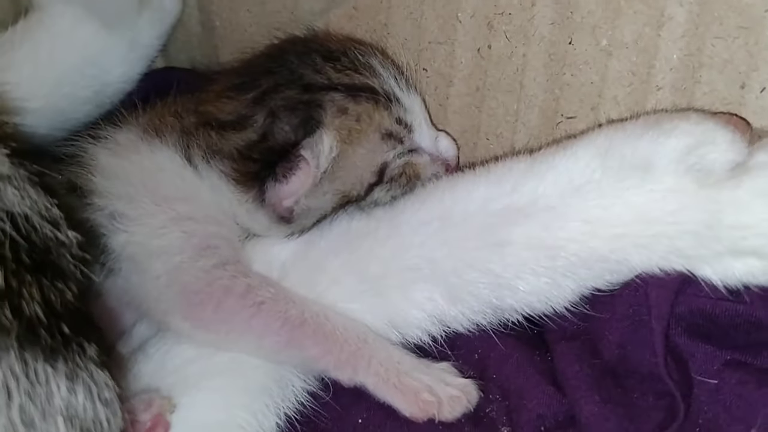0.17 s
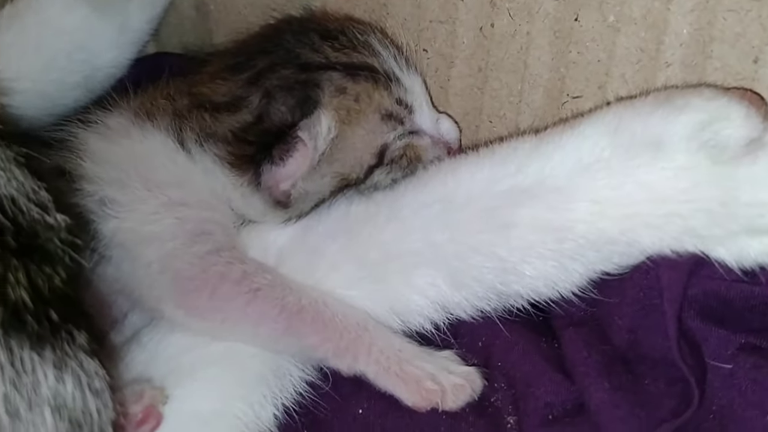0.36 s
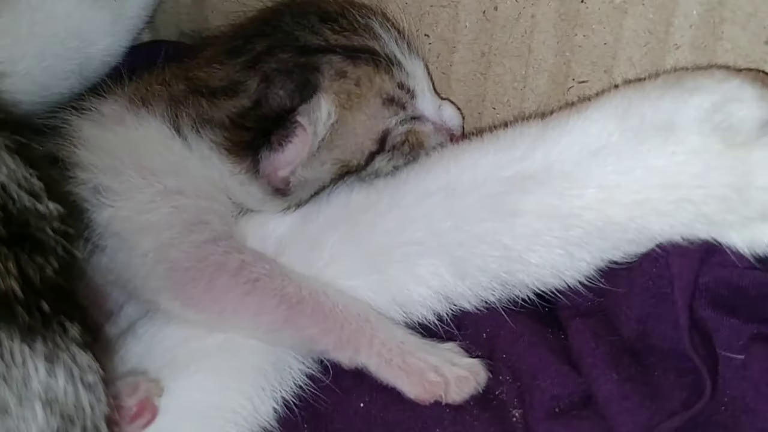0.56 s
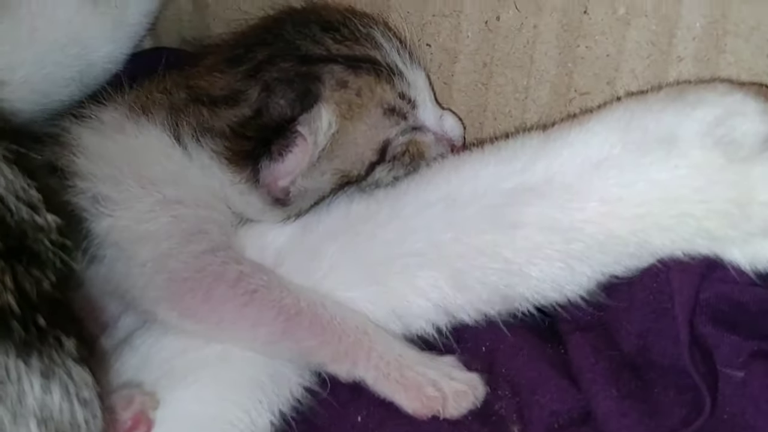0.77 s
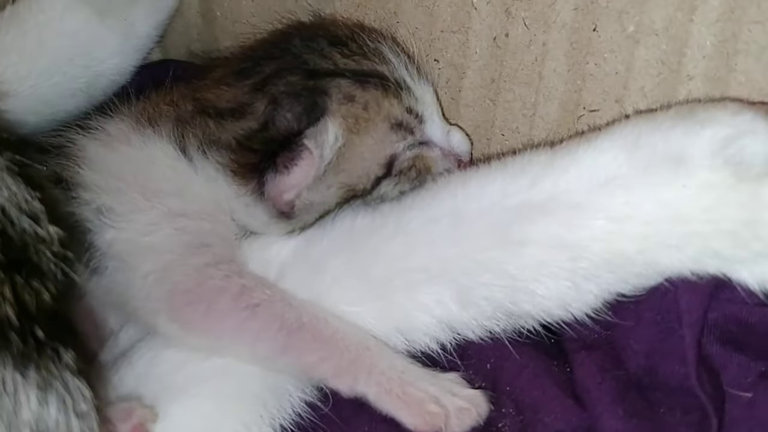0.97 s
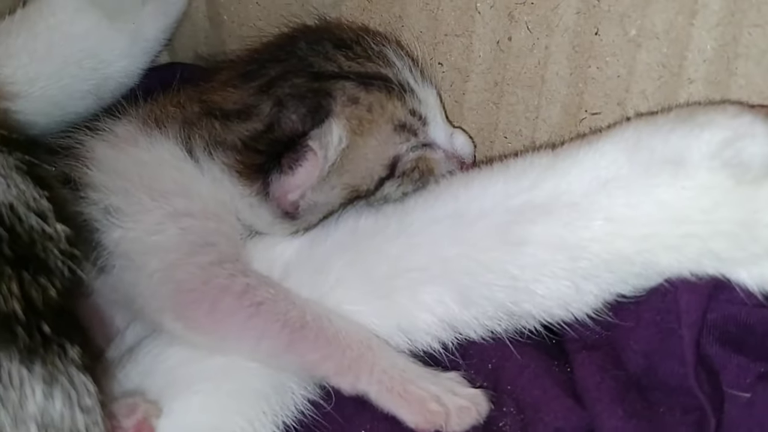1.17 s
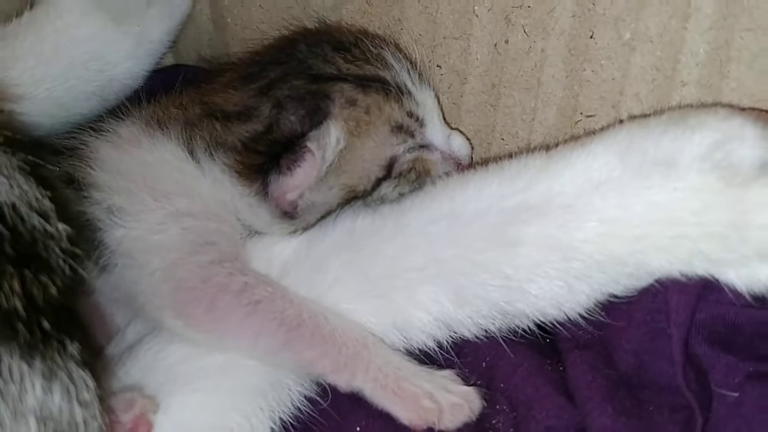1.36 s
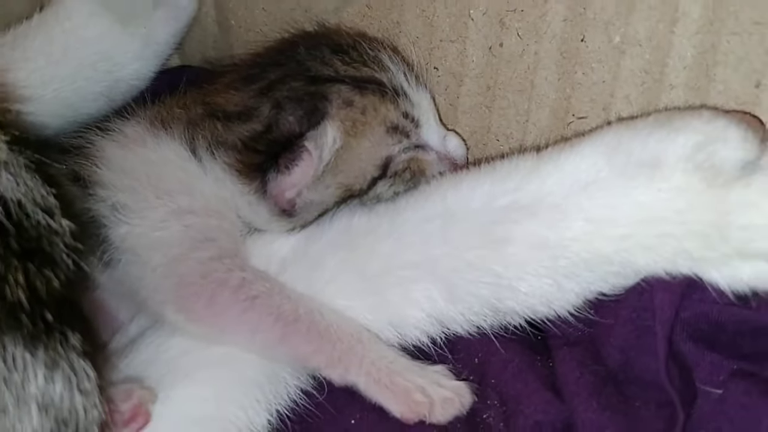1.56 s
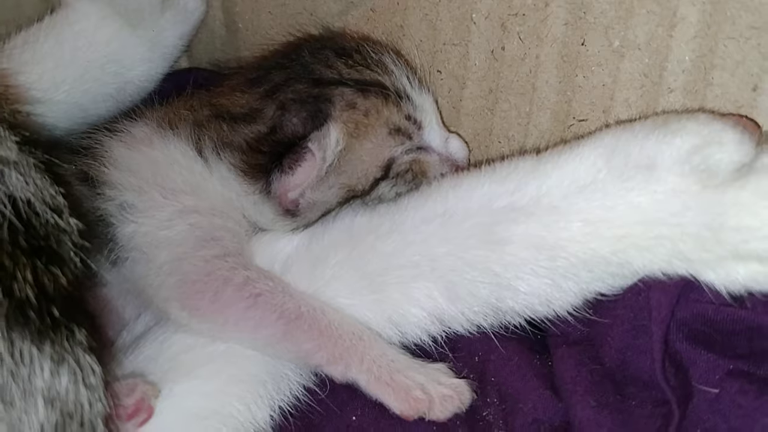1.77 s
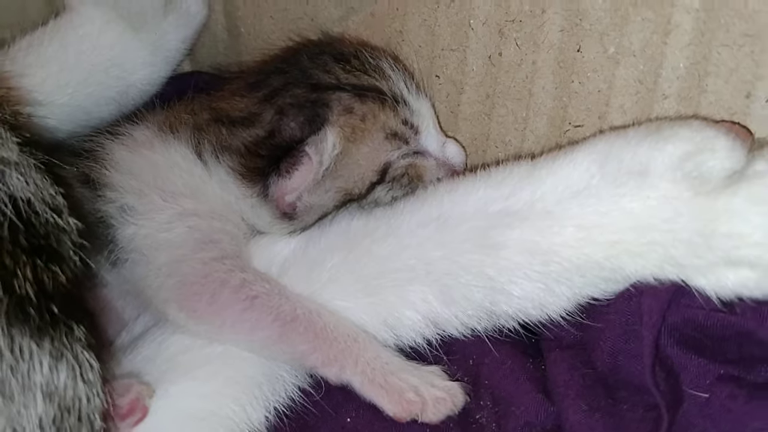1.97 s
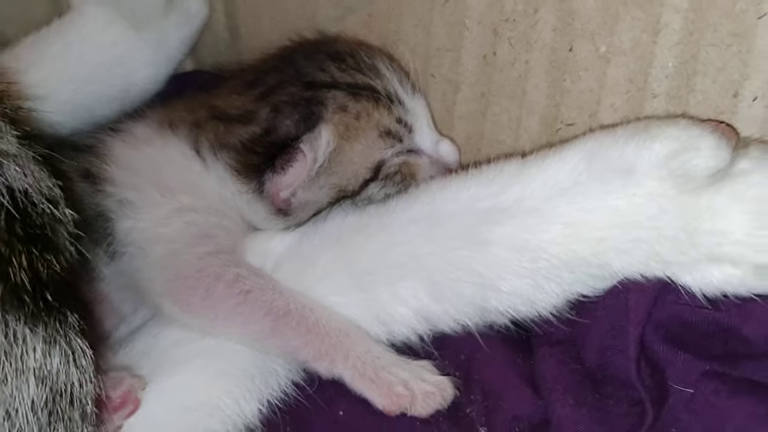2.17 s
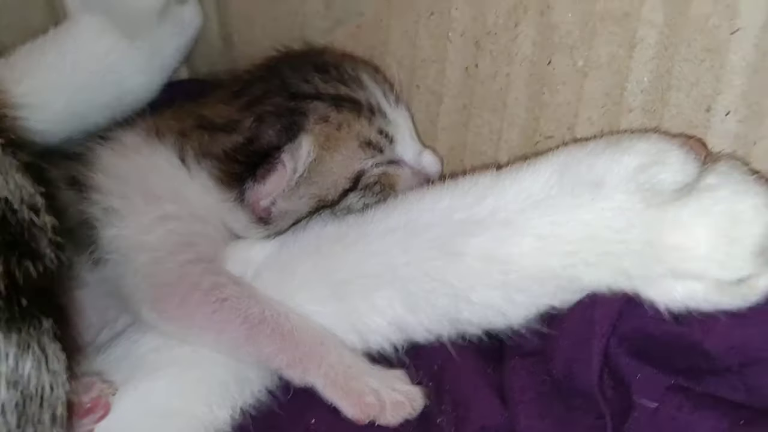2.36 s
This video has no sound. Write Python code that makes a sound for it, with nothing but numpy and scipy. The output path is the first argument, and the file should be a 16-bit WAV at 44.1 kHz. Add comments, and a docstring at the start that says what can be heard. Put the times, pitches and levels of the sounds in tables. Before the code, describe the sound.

A cat purrs softly and low up close, interrupted by one sharp hollow tap on cardboard

```python
"""A soft purr and a low hum are heard first, close to the microphone, over room rumble and hiss.
Throat pulses ring the cat's chest in a cardboard box; two wavering tones make the hum.
The box is bumped once: a short scuff, a sharp tap of rough noise, a hollow ring and low thuds.
Dry ticks are tiny resonances; rustles, crackles and high snaps are bursts of shaped noise.
The tap, and more faintly the ticks, rustles and crackles, draw an answer from the room."""
import sys
import numpy as np
from scipy import signal
from scipy.fft import rfft, irfft, next_fast_len
from scipy.io import wavfile
from scipy.ndimage import map_coordinates

SR = 44100
rng = np.random.default_rng(int(sys.argv[2]) if len(sys.argv) > 2 else 0)


def transcribe(signal):
    """Save signal, clipped to [-1, 1], as a 16-bit WAV file at the path in sys.argv[1]."""
    frames = np.atleast_2d(signal).T
    limited = np.clip(frames, -1, 1)
    pcm = np.round(limited * 32767).astype(np.int16)
    wavfile.write(sys.argv[1], SR, pcm)


N = 110250


def amp(db):
    """Decibels to gain."""
    return 10 ** (np.asarray(db) / 20)


def unit(x):
    """Scale to rms 1."""
    return x / np.sqrt(np.mean(x ** 2) + 1e-20)


def along(points, hz):
    """Read (f/Hz, value) points on a log frequency axis."""
    f, v = np.transpose(points)
    return np.interp(np.log(hz + 1), np.log(f + 1), v)


def curve(rows):
    """Read (t/s, value) points as one value per sample."""
    return np.interp(np.arange(N) / SR, *np.transpose(rows))


def since(s):
    """Seconds since s, zero before."""
    return np.maximum(np.arange(N) / SR - s, 0)


def wobble(rate):
    """A smooth random curve, rate knots a second."""
    knots = rng.standard_normal(int(N * rate / SR) + 4)
    return map_coordinates(knots, [np.arange(N) * rate / SR])


def filtered(x, response):
    """Apply a complex response of frequency to x."""
    m = next_fast_len(N + SR // 2)
    hz = np.fft.rfftfreq(m, 1 / SR)
    return irfft(rfft(x, m) * response(hz), m)[:N]


def noise(colour):
    """Coloured noise of rms 1."""
    return unit(filtered(rng.standard_normal(N), lambda hz: amp(along(colour, hz))))


def grainy(colour, rough_db, rate):
    """Coloured noise of rms 1 that comes in sharp grains, about rate a second."""
    grains = amp(rough_db * np.clip(wobble(rate), -2, 2)) * rng.standard_normal(N)
    return unit(filtered(grains, lambda hz: amp(along(colour, hz))))


def resonate(x, peaks):
    """Pass x through resonances that fall away steeply on both sides."""
    def band(f, centre, width):
        return 1j * f * width / (centre * centre - f * f + 1j * f * width)

    def response(f):
        total = 0
        for k, (centre, width, db) in enumerate(peaks):
            sign = (-1) ** k  # neighbours have opposite signs
            total = total + sign * amp(db) * band(f, centre, width) * band(f, centre, centre)
        return total
    return filtered(x, response)


def impulses(times, sizes):
    """One impulse for each time."""
    return np.bincount(np.clip(np.round(times * SR).astype(int), 0, N - 1), sizes, N)


def purr():
    """Throat pulses ring the chest; each lets through a faint puff of air."""
    # pulse rate of the throat: t/s, pulses per second
    pulse_rate = [(0, 34), (.33, 32.5), (1.0, 32.1), (1.7, 32.1), (1.98, 30.6), (2.5, 31.3)]
    # effort of the purr: t/s, level/dB
    effort = [(0, -66.5), (.225, -63), (.255, -49.5), (.295, -53), (.37, -60), (.49, -69), (.58, -54.5),
              (.68, -57.5), (1.0, -66), (1.13, -67.5), (1.21, -55), (1.29, -56.5), (1.35, -67.5),
              (1.46, -71), (1.6, -58.5), (1.69, -64), (1.89, -63), (1.94, -53.5), (2.03, -54), (2.1, -63),
              (2.5, -73)]
    # resonances of the cat's chest in the box: f/Hz, width/Hz, level/dB
    chest = [(156, 15, 0.5), (184, 24, -1.5), (260, 46, -19), (312, 27, -17.5), (435, 25, -23)]
    # relative colour of the airy flutter: f/Hz, level/dB
    flutter_colour = [(400, 1), (700, 3), (2500, 0), (5000, -7), (12000, -14)]
    # level of the air that the purr lets through: t/s, level/dB
    flutter_level = [(0, -73), (.13, -78), (.28, -70.5), (.37, -84), (.62, -77), (1.0, -76.5), (1.45, -80),
                     (1.78, -95), (1.97, -76), (2.12, -92)]
    jitter_s, scatter_db, flutter_decay_s = 0.00035, 1.5, 0.008

    cycles = np.cumsum(curve(pulse_rate)) / SR
    times = np.flatnonzero(np.diff(np.floor(cycles))) / SR
    chance = rng.standard_normal((len(times), 2))
    pulses = impulses(times + jitter_s * chance[:, 0], amp(scatter_db * chance[:, 1]))
    voice = unit(resonate(pulses, chest))
    gate = signal.lfilter([1], [1, -np.exp(-1 / (flutter_decay_s * SR))], pulses)
    air = unit(gate * noise(flutter_colour))
    return amp(curve(effort)) * voice + amp(curve(flutter_level)) * air


def hum():
    """Two low tones that swell and waver."""
    # swells of the hum: t/s, level/dB
    hum_level = [(0, -62.5), (.33, -56), (.45, -64), (.6, -54.5), (.9, -59.5), (1.1, -56), (1.399, -63.5),
                 (1.7, -59), (1.82, -61.5), (1.92, -56.5), (2.062, -55), (2.2, -69.5), (2.5, -67.5)]
    # swells of the lower drone: t/s, level/dB
    drone_level = [(0, -63.5), (0.179, -57.5), (.42, -61), (.62, -69), (1.0, -62), (1.2, -69.5), (2.5, -75)]

    def tone(hz, level):
        swell = amp(curve(level) + 0.4 * wobble(13.3))  # wobble in dB
        phase = 2 * np.pi * hz * since(0) + 0.078 * wobble(3.5)  # radians
        return np.sqrt(2) * swell * np.sin(phase)
    return tone(100.3, hum_level) + tone(66.2, drone_level)


def background():
    """Low room rumble and microphone hiss, each of slightly uneven level."""
    # relative colour of the room rumble: f/Hz, level/dB
    rumble_colour = [(15, -2.5), (55, -2), (85, -0.5), (125, -7), (200, -9), (300, -16), (380, -25),
                     (1000, -32.5), (2500, -37.5), (5000, -65.5)]
    # relative colour of the microphone hiss: f/Hz, level/dB
    hiss_colour = [(500, 6.5), (2500, 7.5), (4000, 2), (6100, 0.5), (6600, 8.5), (7000, 18), (7450, 3.5),
                   (8400, 4), (9500, -4.5), (12000, 0), (14000, 7.5), (15600, 8.5)]
    rumble_db, hiss_db = -59.5, -71.5
    rumble = amp(rumble_db + 0.16 * wobble(11.0)) * noise(rumble_colour)
    hiss = amp(hiss_db + 0.13 * wobble(3.6)) * noise(hiss_colour)
    return rumble + hiss


def crackles():
    """Hairs catch and slip in fine, dry crackles."""
    # crackles of fur, at their peaks: t/s, level/dB, spread/s
    events = [(.21, -75, .055), (.8195, -63.5, .004), (1.894, -70, 0.0034), (1.965, -79, 0.053),
              (2.024, -77, .003)]
    # their relative colour: f/Hz, level/dB
    colour = [(900, -25), (1400, 1), (1900, -12), (2500, -3), (3000, -7), (3600, 3.5), (4200, -12.5),
              (5000, -7), (6000, -19), (8300, -13), (10000, -39)]
    swell = np.zeros(N)
    for s, db, spread in events:
        swell += amp(db) * np.exp(-.5 * ((since(0) - s) / spread) ** 2)
    return swell * grainy(colour, rough_db=4, rate=700)


def room(x):
    """The room answers with a decaying noise tail, longest in the bass."""
    # decay of the room: f/Hz, t60/s
    decay = [(150, 1.54), (400, 0.59), (1500, 0.38), (4000, 0.62), (12000, 0.04)]
    # colour of its answer: f/Hz, level/dB
    colour = [(60, -4), (240, -1), (380, -1.5), (750, -4), (1300, -1.5), (2300, 1), (4000, -11), (6000, 2),
              (12000, -6)]
    room_db = -3.5
    hz, t, z = signal.stft(rng.standard_normal(SR // 2), SR, nperseg=256)
    fading = z * amp(-60 * t / along(decay, hz)[:, None])
    tail = signal.istft(fading, SR, nperseg=256)[1]
    delayed = np.pad(tail, (SR // 200, 0))  # 5 ms before the first answer
    wet = signal.fftconvolve(x, delayed / np.linalg.norm(tail))[:N]
    return amp(room_db) * filtered(wet, lambda hz: amp(along(colour, hz)))


def ticks():
    """Tiny dry clicks, each with its own pitch and share of ring and edge."""
    # ticks: t/s, relative level/dB, ring/dB, edge/dB, pitch ratio
    events = [(.2495, -55, -5, -6, 0.88), (0.5094, -50, -9, -16, 0.96), (0.5409, -49.5, -0.5, -4.5, 1),
              (0.581, -54, -1, -7, 1.04), (0.5863, -44, -5, -7.5, 0.95), (0.5925, -48.5, 1, -4, 1.03),
              (0.8213, -53, 2.5, 1.5, 1.1), (0.9225, -59, 6, 0, 0.99), (1.078, -55.5, 1, 2, 1.02),
              (1.094, -51, 0, 1.5, 0.97), (1.3097, -65, -2, 10.5, 0.88), (1.5661, -45, -10, -7.5, 0.995),
              (1.6371, -52, 1.5, -10, 0.91), (2.0726, -55, -8, -16, 0.92), (2.2239, -48.5, 0.5, -1, 0.98),
              (2.3941, -53.5, -6, -8.5, 0.83)]
    # resonances before the pitch ratio, all three: f/Hz, width/Hz, level/dB
    # dull body
    body_peaks = [(278, 120, 7), (479, 33, 5), (760, 85, 1.5), (1344, 176, 2), (1716, 99, 1.5)]
    # middle ring
    ring_peaks = [(2200, 230, -10), (2510, 195, 2.5)]
    # bright edge
    edge_peaks = [(3470, 340, -14.5), (4810, 270, -4), (6850, 240, -5.5), (8350, 540, -11.5)]

    click = impulses(np.zeros(1), [1])
    body, ring, edge = [resonate(click, peaks)[:SR // 10]
                        for peaks in (body_peaks, ring_peaks, edge_peaks)]
    t = np.arange(len(body)) / SR
    clicks = np.zeros(N)
    for start, level, ring_db, edge_db, ratio in events:
        shape = body - amp(ring_db) * ring + amp(edge_db) * edge
        clicks += amp(level) * np.interp((since(0) - start) * ratio, t, shape, 0, 0)
    # the highest peak of all sits at the highest level in the table
    loudest_db = max(row[1] for row in events)
    return clicks * amp(loudest_db) / np.abs(clicks).max()


def bump():
    """Each blow gives a rough crack and rings the cardboard."""
    # blows on the box: t/s, relative level/dB, crack/dB relative to the blow
    blows = [(0.7069, -14, -14.5), (0.7306, -17, -6), (.7385, -1.5, 2.5), (0.7455, -3, 1), (.818, -25, 3)]
    # modes of the box: f/Hz, relative level/dB, t60/s
    modes = [(148.5, -49.5, 0.28), (200.6, -36, 0.3), (243.3, -30, 0.22), (256, -45, 0.6),
             (304.5, -49, 0.45), (328, -49, 0.45), (411, -40.5, 0.1), (546.5, -57, 0.24), (611, -58, 0.26),
             (915, -49, 0.08), (1206, -45.5, 0.06), (1384, -46, 0.055), (1607, -51, 0.05)]
    # relative colour of the crack: f/Hz, level/dB
    crack_colour = [(100, -8), (350, 7), (520, -7), (750, -15), (1000, -9), (1450, -8), (2100, -20),
                    (2700, -18.5), (3200, -32), (3900, -16.5), (4500, -20), (5500, -42), (8000, -24.5),
                    (10000, -45), (15000, -32)]
    crack_gain_db, crack_t60_s, ring_gain_db = -37.5, 0.036, 1.0

    crack, ring = np.zeros(N), np.zeros(N)
    for s, db, crack_db in blows:
        t = since(s)
        grain = grainy(crack_colour, rough_db=3.5, rate=900)
        fade = amp(db + crack_db + crack_gain_db - 60 * t / crack_t60_s)
        crack += fade * (1 - np.exp(-t / 0.0003)) * grain  # 0.3 ms onset
        t = t[:int((s + .5) * SR)]  # half a second of ring
        for hz, level, t60 in modes:
            fade = amp(db + level + ring_gain_db - 60 * t / t60)
            onset = 1 - np.exp(-t * hz / .5)  # builds over half a cycle
            ring[:len(t)] += fade * onset * np.sin(2 * np.pi * hz * t)
    return crack, ring


def rustles():
    """Fur and bedding brush the cardboard in short grainy swells."""
    # rustles, at their peaks: t/s, level/dB, attack/s, release/s, fizz/dB relative to the body
    events = [(0.738, -51.5, 0.009, 0.012, -1.5), (0.82, -60, 0.003, 0.0071, -17),
              (.958, -65, 0.033, 0.022, -6), (1.102, -68, 0.037, 0.026, -6),
              (1.38, -68.5, 0.011, 0.0062, -11), (1.844, -69.5, 0.0021, 0.0035, -4),
              (2.441, -74.5, 0.011, 0.021, 10)]
    # relative colour of the body: f/Hz, level/dB
    body_colour = [(200, -0.5), (700, 4.5), (1400, -3), (2400, -8.5), (3200, -18), (4100, -7.5),
                   (5000, -18), (9000, -30), (15000, -41)]
    # relative colour of the fizz: f/Hz, level/dB
    fizz_colour = [(2000, -55), (6000, -10), (8100, 2), (10000, -12), (12500, 2), (15500, -0.5)]
    body, fizz = np.zeros(N), np.zeros(N)
    for s, db, attack, release, fizz_db in events:
        t = since(0) - s
        swell = amp(db) * np.exp(np.minimum(t / attack, -t / release))
        body += swell
        fizz += swell * amp(fizz_db)
    dull = body * grainy(body_colour, rough_db=2.5, rate=700)
    return dull + fizz * grainy(fizz_colour, rough_db=3, rate=700)


def thuds():
    """The box floor gives way and swings back, faster as it stiffens."""
    # thuds of the floor: t/s, f/Hz, rise/(Hz per s), level/dB, attack/s, t60/s
    events = [(.7495, 54, 380, -28.5, 0.0086, 0.16), (.742, 33, 2, -35, 0.0086, 0.2),
              (0.93, 40, 0, -43, 0.0047, 0.28)]
    out = np.zeros(N)
    for s, hz, rise, db, attack, t60 in events:
        t = since(s)
        fade = amp(db - 60 * t / t60) * (1 - np.exp(-t / attack))
        out += fade * np.sin(2 * np.pi * (hz + rise * t / 2) * t)
    return out


def snaps():
    """Hair-thin snaps of noise high in the treble start at once and die in milliseconds."""
    # snaps: t/s, level/dB
    events = [(0.785, -55), (1.6368, -48), (2.393, -58)]
    # their relative colour: f/Hz, level/dB
    colour = [(6000, -30), (10000, -15), (13000, -3), (15500, -3.5)]
    t60_s = 0.005
    envelope = np.zeros(N)
    for s, db in events:
        envelope += amp(db - 60 * since(s) / t60_s) * (since(s) > 0)
    return envelope * noise(colour)


def scene():
    """All sources lie close; the crack and, more faintly, the small sounds reach the room."""
    small_send_db = -8.5
    crack, ring = bump()
    small = ticks() + rustles() + crackles()
    close = purr() + hum() + crack + ring + thuds() + small + snaps()
    answer = room(crack + amp(small_send_db) * small)
    return (close + answer + background())[None]


def record(dry):
    """Nothing is kept above the recorder's band limit."""
    top_hz = 15850
    return filtered(dry[0], lambda hz: hz < top_hz)[None]


dry = scene()
out = record(dry)
transcribe(out)
```